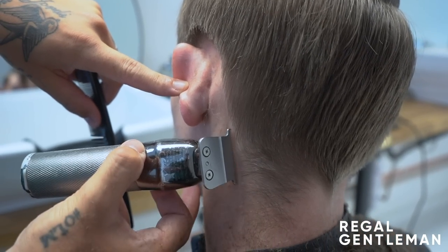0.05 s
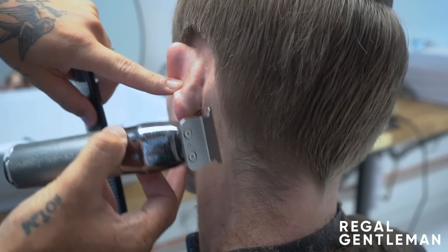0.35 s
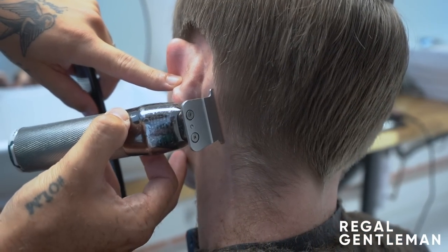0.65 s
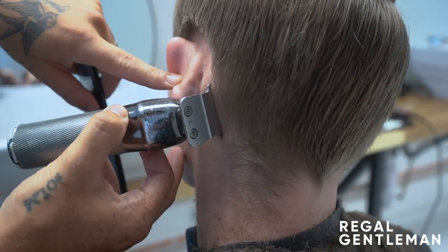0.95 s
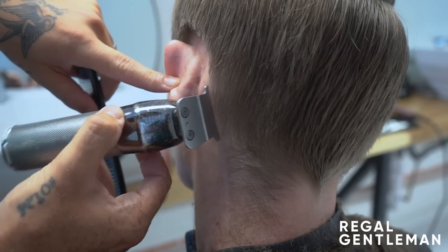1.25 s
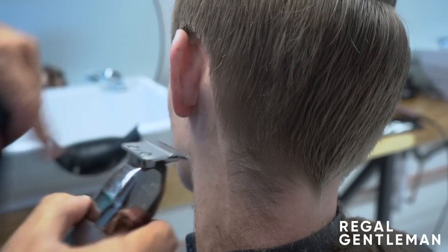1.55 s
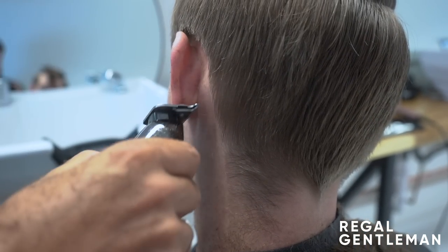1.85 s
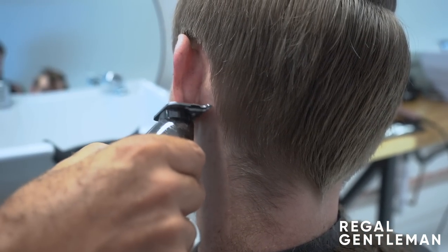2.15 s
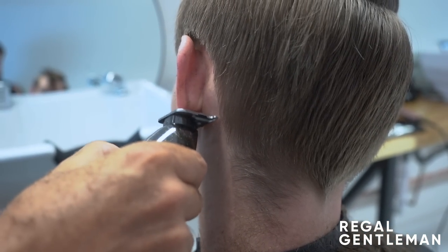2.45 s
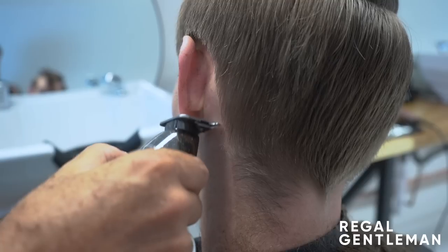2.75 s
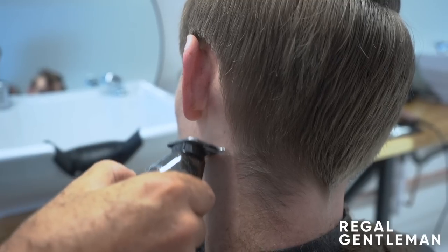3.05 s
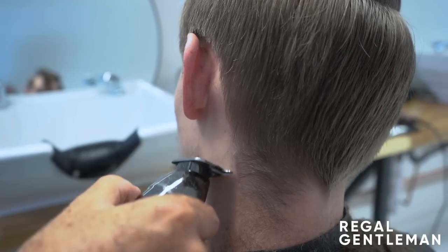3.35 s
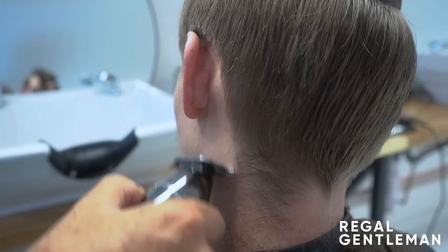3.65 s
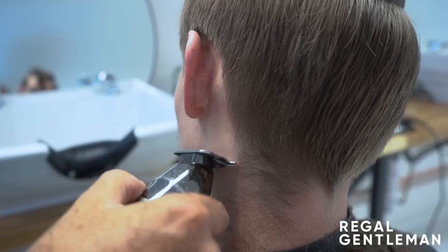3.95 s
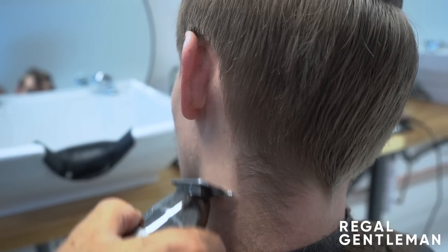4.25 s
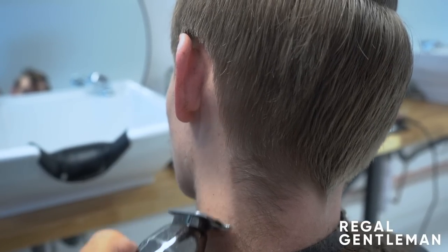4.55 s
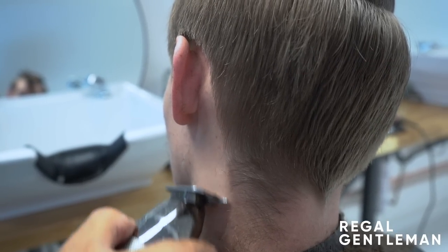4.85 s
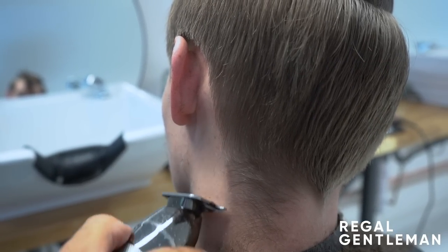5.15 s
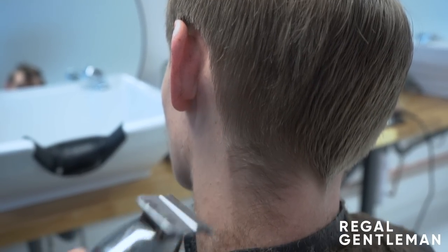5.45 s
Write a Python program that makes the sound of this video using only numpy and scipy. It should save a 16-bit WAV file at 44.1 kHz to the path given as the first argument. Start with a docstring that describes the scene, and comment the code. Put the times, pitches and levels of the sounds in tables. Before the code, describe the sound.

Close, steady electric trimmer buzz with the crisp rasp of hair being cut, and a short squeaky scrape somewhere in the shop.

```python
"""In a barber shop, a cordless hair trimmer buzzes close up, edging behind an ear and down the neck.
Its blade slaps at both ends of each swing and sets the housing ringing; the tone shifts as the hand
turns it from flat to upright. Cut hair rasps in time with the blade, and tufts drag on the motor.
Ventilation and appliances hum underneath, and once something in the room scrapes with a hollow squeak."""
import sys
import numpy as np
from scipy import signal
from scipy.fft import rfft, irfft, next_fast_len
from scipy.io import wavfile
from scipy.ndimage import uniform_filter1d, map_coordinates

SR = 44100
rng = np.random.default_rng(int(sys.argv[2]) if len(sys.argv) > 2 else 0)


def store_wav(level_fs):
    """Save 16-bit WAV to argv[1]."""
    pcm = np.round(np.clip(np.atleast_2d(level_fs), -1, 1) * 32767)
    wavfile.write(sys.argv[1], SR, pcm.T.astype(np.int16))


N = 251811

# motor speed, drifting with battery and grip: (time [s], blade rate [Hz])
MOTOR_SPEED = [(0, 119.9), (.2, 119.9), (.35, 121), (.46, 119.8), (.97, 120), (1.11, 120.5), (1.55, 120.3),
               (2.0, 120.25), (2.12, 121.6), (2.21, 120.1), (2.3, 119), (2.55, 120.1), (5.71, 120.2)]
# tufts of hair entering the teeth: (time [s], cutting level [dB], motor sag [Hz])
TUFTS = [(1.26, -34, 0.61), (1.47, -37, -0.0045), (2.26, -34, -0.041), (2.93, -31, -0.16),
         (3.08, -37, 0.474), (3.33, -32, 0.283), (3.45, -31, 0.21), (3.79, -32.5, 0.483), (4.02, -34, 0.17),
         (4.25, -28, 0.423), (4.39, -37.5, 0.299), (4.56, -34, 0.48), (4.65, -29, 0.54), (5.05, -27, 0.69),
         (5.38, -33, 0.33)]
TUFT_S = .045  # half the time a tuft takes to pass
TOP_HZ = 15850


def amp(db):
    """Decibels to gain."""
    return 10 ** (np.asarray(db) / 20)


def unit(x):
    """x at rms 1."""
    return x / np.sqrt(np.mean(x ** 2) + 1e-20)


def along(points, hz):
    """(frequency [Hz], value) points read on a log axis."""
    f, v = np.transpose(points)
    return np.interp(np.log(hz + 1), np.log(f + 1), v)


def curves(rows):
    """One automation curve for each column after the time."""
    s, *cols = np.transpose(rows)
    return [np.interp(np.arange(N) / SR, s, c) for c in cols]


def bell(centre_s, width_s):
    """A smooth swell to 1 around a moment."""
    return np.exp(-((np.arange(N) / SR - centre_s) / width_s) ** 2)


def wobble(rate):
    """A smooth random curve, rate knots a second."""
    return map_coordinates(rng.standard_normal(int(N * rate / SR) + 4), [np.arange(N) * rate / SR])


def drifting(travel, size):
    """Rows of unit noise that crossfade as the hand travels."""
    knots = rng.standard_normal((200, size))
    step, angle = travel[:, 0].astype(int), travel % 1 * np.pi / 2
    return np.cos(angle) * knots[step % len(knots)] + np.sin(angle) * knots[(step + 1) % len(knots)]


def filtered(x, response):
    """x through a complex frequency response."""
    m = next_fast_len(N + SR // 2)
    return irfft(rfft(x, m) * response(np.fft.rfftfreq(m, 1 / SR)), m)[:N]


def coloured(x, spectrum):
    """x through an EQ curve, at rms 1."""
    return unit(filtered(x, lambda hz: amp(along(spectrum, hz))))


def share(pose, index):
    """How much of a pose is heard, 0 to 1."""
    return np.clip(1 - np.abs(pose - index), 0, 1)


def per_cycle(values, phase):
    """A control read once in each blade cycle, as a column."""
    return np.interp(np.arange(int(phase[-1]) + 2) + .5, phase, values)[:, None]


def shop():
    """Room tone: ventilation rumble and the mains hum of appliances."""
    # ventilation colour: (frequency [Hz], relative level [dB])
    vent_eq = [(15, -34), (28, -13), (45, 8), (65, -12), (95, -1), (130, -9.5), (190, -6), (260, -9.5),
               (600, -12.5), (1100, -10), (2000, -19.5), (8000, -39.5)]
    # appliance tones: (frequency [Hz], rms level [dB])
    mains = [(48.4, -50.5), (99.5, -77), (199.5, -56.5)]
    t = np.arange(N) / SR
    hum = sum(amp(db + 0.8 * wobble(6)) * np.sqrt(2) * np.sin(2 * np.pi * hz * t + .4 * wobble(7.2))
              for hz, db in mains)
    return hum + amp(-46) * coloured(rng.standard_normal(N), vent_eq)


def room(x, t60=0.49):
    """Short reverb off the shop's hard walls."""
    t = np.arange(SR // 2) / SR
    tail = rng.standard_normal(len(t)) * amp(-60 * t / t60) * (t > .005)
    return signal.fftconvolve(x, tail / np.linalg.norm(tail))[:N]


def scrape():
    """Something like a chair leg sticks and slips at an uneven rate, ringing a hollow body."""
    # shoves: (time [s], peak level [dB])
    pushes = [(4.315, -21.7), (4.39, -19.6), (4.57, -30), (4.72, -41)]
    # body resonances: (frequency [Hz], width [Hz], relative level [dB])
    modes = [(825, 48, -27), (995, 15, -2.5), (1107, 15, -11), (1279, 55, -25.5), (1520, 300, -31.5)]
    attack_s, fall_db_per_s = 0.08, 135
    t = np.arange(N) / SR
    swells = [amp(db - fall_db_per_s * np.maximum(t - s, 0)) * np.clip(1 + (t - s) / attack_s, 0, 1)
              for s, db in pushes]
    slip_phase = np.cumsum(48 * np.exp(.35 * wobble(40))) / SR
    slips = rng.standard_normal(N) * (0.23 + np.exp(-(slip_phase % 1) / 0.163))
    body = lambda f: sum((-1) ** k * amp(db) * 1j * f * width / (hz * hz - f * f + 1j * f * width)
                         for k, (hz, width, db) in enumerate(modes))
    ring = filtered(slips, body)
    levelled = ring / np.sqrt(np.abs(uniform_filter1d(ring ** 2, size=2200)) + 1e-20)
    return np.max(swells, axis=0) * levelled


def motor():
    """Blade cycles so far: tufts slow the motor, which then overshoots."""
    overshoot, delay_s = .65, 0.106
    speed, = curves(MOTOR_SPEED)
    drag = sum(sag * (bell(s, TUFT_S) - overshoot * bell(s + delay_s, TUFT_S)) for s, _, sag in TUFTS)
    return np.cumsum(speed - drag + 0.084 * wobble(45)) / SR


def cutting(pose):
    """Level of the hair being cut, in dB: steady stubble plus tufts."""
    # stubble level by pose: (flat [dB], upright [dB], neck [dB])
    stubble_db = [-31, -34.5, -32]
    stubble = amp(np.interp(pose, np.arange(len(stubble_db)), stubble_db))
    return 10 * np.log10(stubble ** 2 + sum(amp(db) ** 2 * bell(s, TUFT_S) for s, db, _ in TUFTS))


def pressure():
    """Each stroke leans on the skin, holds and lets go, 0 to 1."""
    # strokes of the hand: (start [s], end [s], force [0-1])
    strokes = [(1.757, 2.74, 0.98), (2.74, 3.07, 0.99), (3.125, 3.6, .55), (3.72, 4.028, 1),
               (4.1, 4.453, 1), (4.476, 4.66, 1), (4.76, 5.053, 0.94), (5.2, 5.399, 0.59)]
    press_s, release_s = .11, .12
    t = np.arange(N) / SR
    return sum(
        force * np.sin(np.pi / 2 * np.clip(np.minimum((t - start) / press_s, (end - t) / release_s), 0, 1))
        for start, end, force in strokes)


def blows(phase, decay, back_db, back_at=0.509):
    """Envelope of the two blade reversals in a cycle; decay and back_at are in cycles."""
    swell = lambda u: u / decay * np.exp(1 - u / decay)
    return swell(phase % 1) + amp(back_db) * swell((phase - back_at) % 1)


def buzz(phase, gains, travel, decay, back_db, echo, size=1024):
    """A unit-level buzz, one row of harmonic gains per cycle, bunched behind the two reversals."""
    count = gains.shape[1]
    burst = drifting(travel / 2, size) * blows(np.arange(size) / size, decay, back_db)
    ring = rfft(burst)[:, 1:count + 1]
    whitened = ring / np.sqrt(np.abs(ring) ** 2 + .01 * np.mean(np.abs(ring) ** 2))
    # reflections off head and hand add to or cancel each harmonic as the trimmer moves
    paths = 1 + echo * (drifting(travel, count) + 1j * drifting(travel, count))
    cycles = irfft(np.pad(gains * whitened * paths, ((0, 0), (1, 0))), size)
    cycles = cycles / cycles.std(axis=1, keepdims=True)
    return map_coordinates(cycles.ravel(), [phase * size], order=1, mode="nearest")


def rasp(phase, pose, cut_db):
    """Hairs snap each time the teeth close: spiky noise pulsing twice a cycle."""
    # rasp colour, held flat and upright: (frequency [Hz], relative level [dB])
    flat_eq = [(200, -41), (500, -22), (1100, -9), (1800, -15), (2400, -4), (3600, -3.5), (4200, -3),
               (5200, -6), (6200, -5.5), (8000, -3.5), (9500, -7.5), (11800, -11.5), (13500, -16),
               (15500, -27)]
    upright_eq = [(200, -26), (500, -8.5), (1100, -7), (1800, -7.5), (2400, 1.5), (3600, 1), (4200, -1),
                  (5200, -2.5), (6200, -2), (8000, -8), (9500, -6.5), (11800, -13), (13500, -6.5),
                  (15500, -24)]
    crackle = rng.standard_normal(N) * amp(2.4 * wobble(1500))
    snaps = crackle * (0.59 + blows(phase, decay=0.066, back_db=4.5))
    flat = share(pose, 0)
    blend = np.sqrt(flat) * coloured(snaps, flat_eq) + np.sqrt(1 - flat) * coloured(snaps, upright_eq)
    return amp(cut_db - 1) * blend


def free_blade(phase, hz, travel):
    """Off the neck, the blade slaps mainly at one end of its swing; gives the rattle and the lift."""
    # lifts off the skin: (start [s], end [s], rattle level [dB])
    lifts = [(4.641, 4.77, -28.5), (5.03, 5.209, -25), (5.37, 5.536, -25)]
    # ring of the free blade: (frequency [Hz], relative level [dB])
    free_eq = [(4600, -23), (5800, -4), (6200, -5), (6600, -3.5), (7200, -8), (8000, -14), (9000, -29),
               (15800, -30)]
    t = np.arange(N) / SR
    arcs = np.array([np.sin(np.pi * np.clip((t - start) / (end - start), 0, 1))
                     for start, end, _ in lifts])
    rattle = buzz(phase, amp(along(free_eq, hz))[None], 0 * travel, decay=.03, back_db=-20, echo=0)
    return amp(np.array(lifts)[:, 2]) @ arcs * rattle, arcs.sum(axis=0)


def blade(phase, pose, travel, load):
    """Steel rings after both blows of each cycle, in three bands: a low slap, a brighter ring and high ticks.
    Hair in the teeth unsettles the blows' timing and strength."""
    # unpressed contacts, as the blade faces us or turns away: (time [s], slap [dB], ring [dB], tick [dB])
    levels = [(0, -27.5, -27, -39.5), (.43, -27.5, -26.5, -34), (.58, -28, -31, -35),
              (1.35, -29, -29.5, -33), (1.48, -29.5, -26.5, -34.5), (1.57, -29.5, -31.5, -39.5),
              (1.76, -27, -28, -33), (2.75, -28, -29, -32), (5.25, -27, -31, -35),
              (5.53, -29.5, -31.5, -36), (5.62, -30.5, -27.5, -41)]
    # boost at full force: (slap [dB], ring [dB], tick [dB])
    boosts = [3, 3.5, 0.74]
    # slap, ring and tick bands: (low [Hz], high [Hz], decay [cycles], return blow [dB])
    bands = [(4620, 6420, 0.04, -5), (6420, 8820, .055, 0), (8820, 15850, 0.059, 0)]
    # steel colour held flat, upright and pressed on the neck: (frequency [Hz], relative level [dB])
    flat_eq = [(4700, 1), (5050, -4.5), (5450, 3), (5900, -3.5), (6300, -5.5), (7300, -4.5), (8100, -5.5),
               (9000, -10), (10400, -18.5), (11300, -7.5), (12700, -12), (13600, -7), (14600, -15.5),
               (15800, -12)]
    upright_eq = [(4700, -4.5), (5050, -3), (5450, -7), (5850, 3), (6250, 4.5), (6700, 2), (7300, 2),
                  (8000, 0), (8700, -10.5), (10200, -12), (11400, -8.5), (12400, -12), (13500, -9.5),
                  (15800, -14)]
    neck_eq = [(4700, -0.5), (5300, -5.5), (5650, 0.5), (5900, 7), (6300, 2), (6700, -1), (7300, -1.5),
               (7800, -5), (8300, 3), (8800, -8), (10200, -13), (11900, -7), (13100, -14), (13900, -2),
               (14600, -15.5), (15800, -13.5)]
    patchy_db, evening_db, lift_duck_db = 1.7, 4, -2.5
    pitch = np.mean(np.array(MOTOR_SPEED)[:, 1])
    hz = np.arange(pitch, TOP_HZ, pitch)
    held, force = per_cycle(pose, phase), pressure()
    press = per_cycle(force, phase)
    flat, neck = share(held, 0), np.clip(held - 1, 0, 1) * np.clip(press, 0, 1)
    upright = 1 - flat - neck
    ring_db = flat * along(flat_eq, hz) + neck * along(neck_eq, hz) + upright * along(upright_eq, hz)
    # the ring changes with the spot that touches the skin
    spot = .8 * travel + 1.3 * press
    patches = unit(uniform_filter1d(drifting(2 * travel + spot, len(hz)), size=5, axis=1))
    steel = amp(ring_db + patchy_db * patches)
    loose = phase + 0.0003 * load * wobble(240) + 0.00045 * wobble(15)
    contacts = 0
    for db, boost_db, (low, high, decay, back_db) in zip(curves(levels), boosts, bands):
        gains = steel * (hz >= low) * (hz < high)
        return_db = np.minimum(back_db + evening_db * neck, 0)  # the neck evens out the two reversals
        contacts += amp(db + boost_db * force) * buzz(loose, gains, spot, decay, return_db, echo=0.2)
    rattle, lifted = free_blade(loose, hz, spot)
    flutter = amp(0.42 * load * wobble(240))
    return flutter * (amp(lift_duck_db * lifted) * contacts + rattle)


def housing(phase, pose, travel, load):
    """The shaking handle hums on the lowest harmonics; above them the shell rings after every blow."""
    # nearness of the trimmer: (time [s], level [dB])
    nearness = [(0, -19), (1.34, -18), (1.46, -20.5), (1.58, -19), (1.74, -17), (2.0, -16.5), (2.15, -18),
                (4.1, -15.5), (5.0, -15.5), (5.17, -17.5), (5.35, -16.6), (5.6, -20.5)]
    # housing tone in each pose: (harmonic [x blade rate], relative level [dB])
    flat = [(1, -18.5), (2, -41), (3, -21.5), (4, -39), (5, -18), (6, -32.5), (7, -11), (8, -20.5), (9, -6),
            (10, -8.5), (11, -24), (12, -16.5), (13, -13), (14, -25.5), (15, -17), (16, -23.5), (17, -11),
            (18, -16), (19, -1.5), (20, -15), (21, -4.5), (22, -8.5), (23, -2), (24, -2.5), (25, -3),
            (26, -6), (27, -20), (28, -6.5), (29, -6.5), (30, -3.5), (31, -11.5), (32, -4), (33, -6.5),
            (34, 1), (35, -5), (36, -5), (37, -7.5), (38, -20)]
    upright = [(1, -18.5), (2, -39.5), (3, -15.5), (4, -28), (5, -20.5), (6, -31.5), (7, -21), (8, -25),
               (9, -25), (10, -16.5), (11, -5), (12, -26.5), (13, -12), (14, -9), (15, -11), (16, -25.5),
               (17, -3.5), (18, -7.5), (19, 2), (20, -9.5), (21, -4.5), (22, -8.5), (23, -7), (24, -18.5),
               (25, -5.5), (26, -13), (27, -16), (28, -15), (29, -3), (30, -17), (31, -5), (32, -12),
               (33, -24), (34, -15), (35, -16), (36, -37), (37, -15.5), (38, -22.5)]
    neck = [(1, -22), (2, -39), (3, -15), (4, -29.5), (5, -25.5), (6, -27.5), (7, -20.5), (8, -27.5),
            (9, -17), (10, -16.5), (11, -9), (12, -20.5), (13, -11.5), (14, -9.5), (15, -14), (16, -25),
            (17, -5.5), (18, -5.5), (19, 1), (20, -12.5), (21, -3), (22, -6.5), (23, -13.5), (24, -23),
            (25, -15), (26, -15), (27, -15), (28, -13.5), (29, -8.5), (30, -13.5), (31, -8), (32, -16),
            (33, -20), (34, -19.5), (35, -17), (36, -35), (37, -17), (38, -15.5)]
    hum_harmonics, hum_offset_db = 4, -21
    buzz_db, = curves(nearness)
    # the hum dips as the turning handle shakes across the microphone
    hum_db = buzz_db + hum_offset_db - 14 * bell(centre_s=1.544, width_s=0.083)
    held = per_cycle(pose, phase)
    gains = sum(share(held, i) * amp(np.array(tone)[:, 1]) for i, tone in enumerate((flat, upright, neck)))
    low = np.arange(gains.shape[1]) < hum_harmonics
    hum = buzz(phase, gains * low, 0 * travel, decay=0.25, back_db=-11, echo=0)
    shaken = phase + 0.00042 * load * wobble(200)
    shell = buzz(shaken, gains * ~low, .5 * travel, decay=.2, back_db=-1.5, echo=.18)
    return amp(hum_db) * hum + amp(buzz_db + 0.22 * load * wobble(120)) * shell


def scene():
    """One motor drives housing, blade and rasp over the room tone; teeth and scrape feed the reverb."""
    # the grip: (time [s], pose [0 flat by the ear, 1 upright by the ear, 2 upright on the neck])
    grip = [(0, 0.008), (1.36, 0.044), (1.45, .3), (1.56, .5), (1.64, .9), (1.74, 1.02), (2.7, 0.88),
            (3.6, 1.35), (3.85, 1.8), (5.05, 1.97), (5.42, 1.4), (5.56, .85), (5.71, .65)]
    pose = np.clip(curves(grip)[0], 0, 2)
    phase, cut_db = motor(), cutting(pose)
    load = unit(amp(cut_db) ** 0.86)  # thick tufts snag the blade more than single hairs
    # the hand creeps along the hairline and swings when the trimmer is turned
    turning = np.abs(np.gradient(share(pose, 0)))
    travel = per_cycle(np.cumsum(1.2 / SR + 3.55 * turning), phase)
    teeth = blade(phase, pose, travel, load) + rasp(phase, pose, cut_db)
    trimmer = housing(phase, pose, travel, load) + teeth
    squeak = scrape()
    reverb = room(amp(-17) * teeth + amp(-14) * squeak)
    return (trimmer + squeak + reverb + shop())[None]


def record(dry):
    """A brick-wall low-pass takes off the very top."""
    return filtered(dry[0], lambda hz: hz < TOP_HZ)[None]


dry = scene()
out = record(dry)
store_wav(out)
```